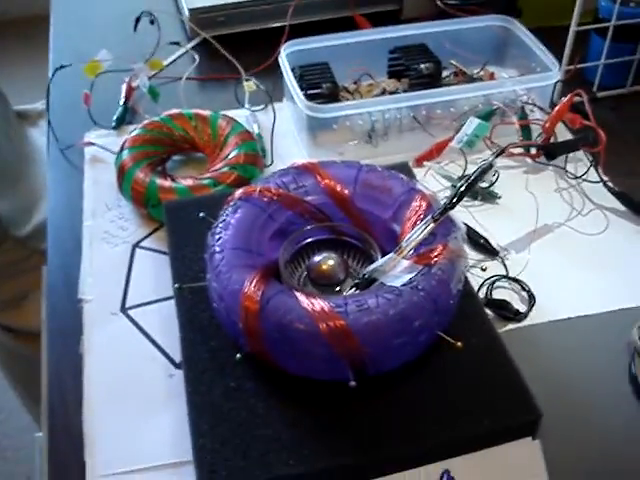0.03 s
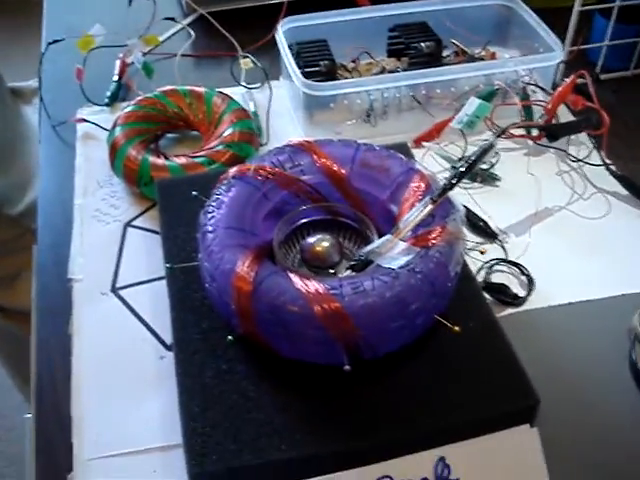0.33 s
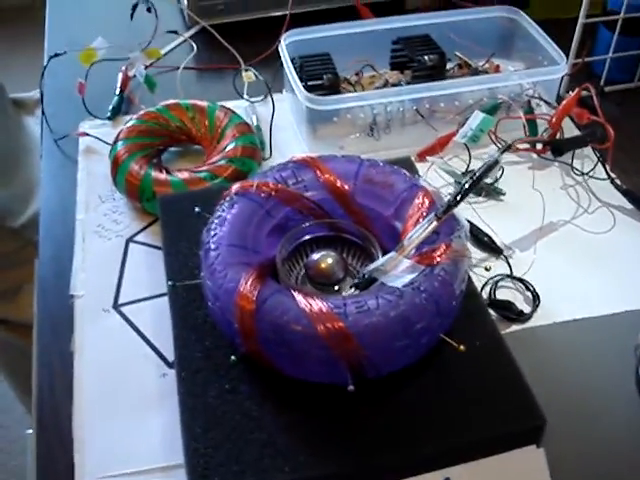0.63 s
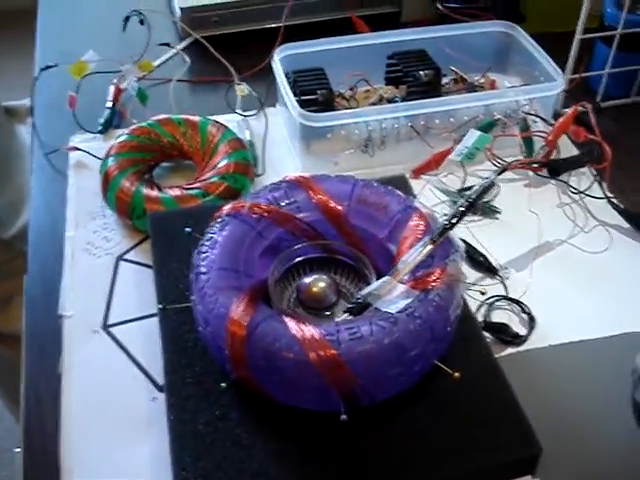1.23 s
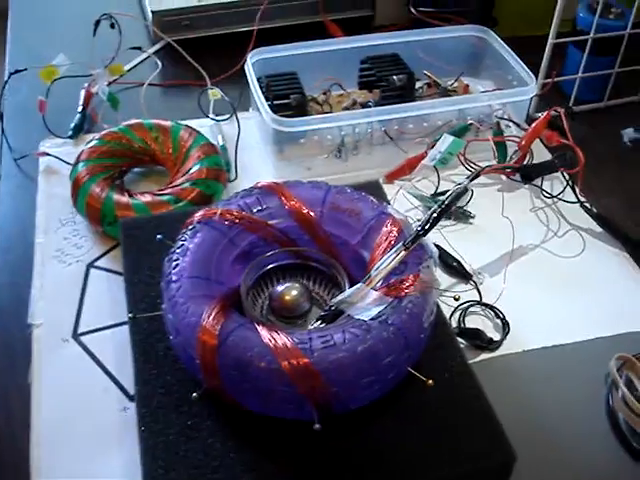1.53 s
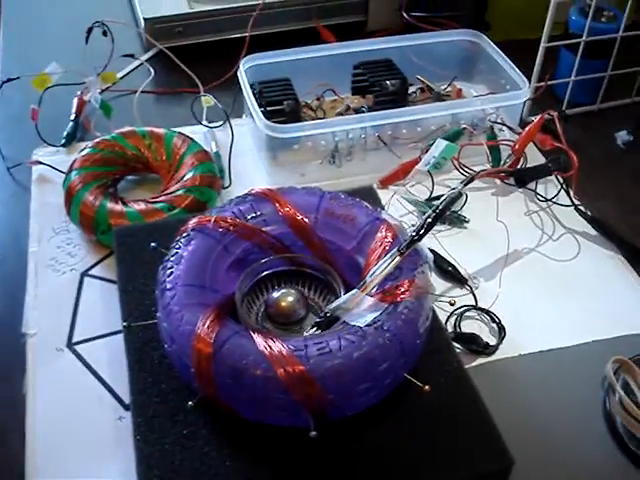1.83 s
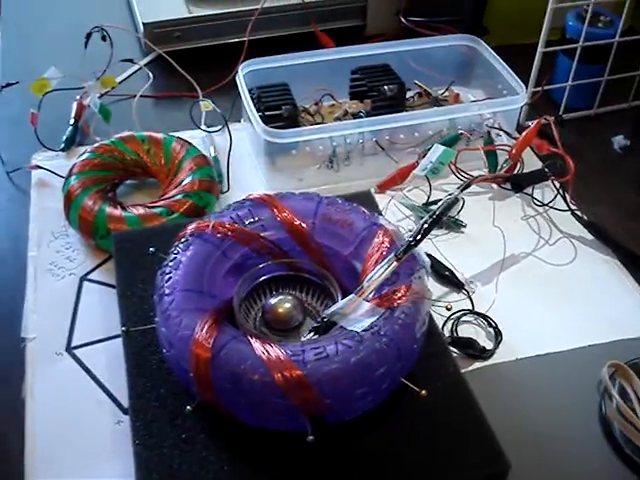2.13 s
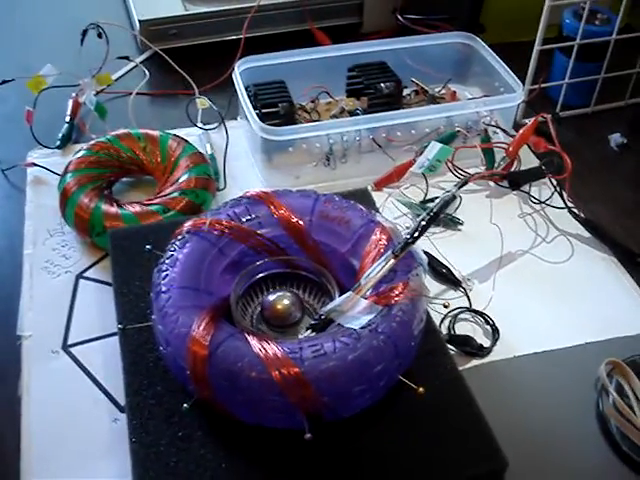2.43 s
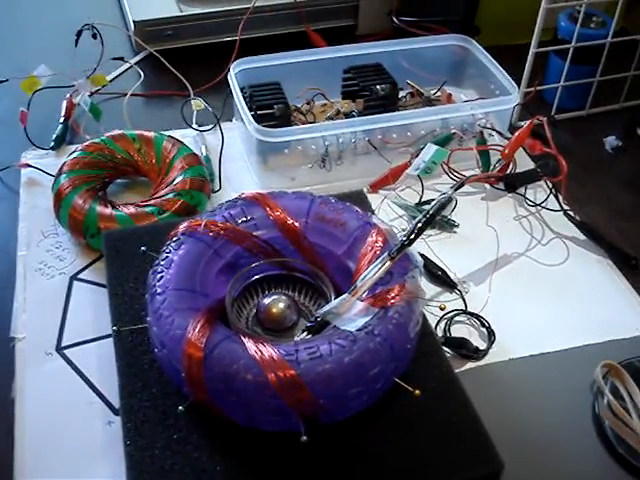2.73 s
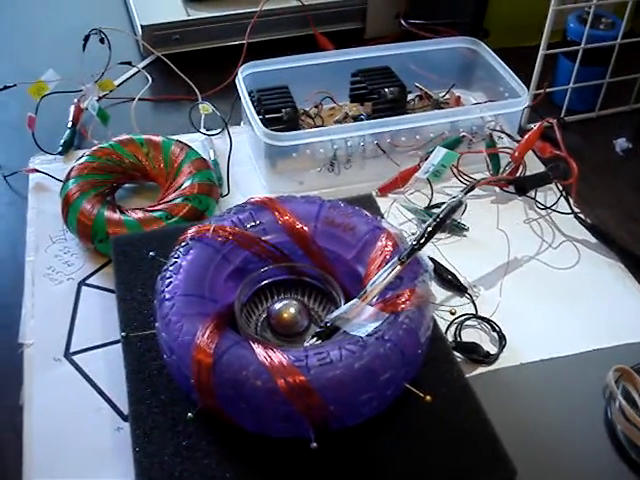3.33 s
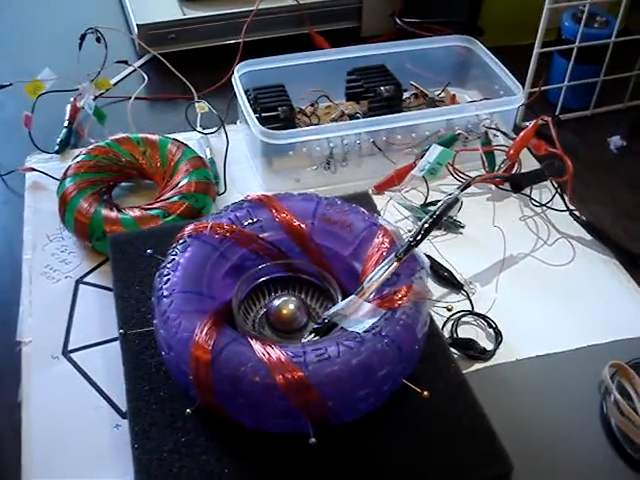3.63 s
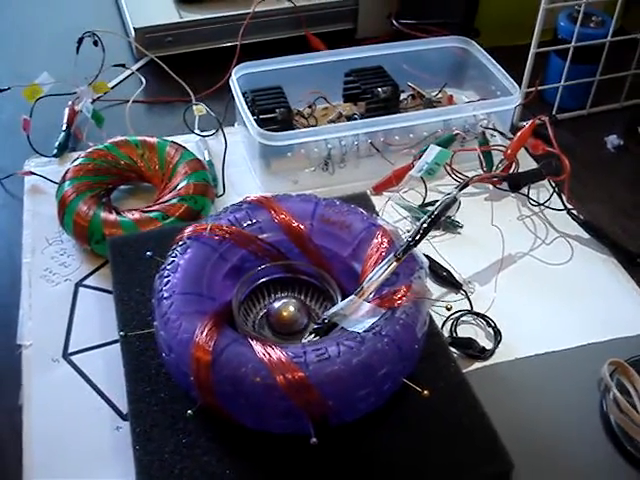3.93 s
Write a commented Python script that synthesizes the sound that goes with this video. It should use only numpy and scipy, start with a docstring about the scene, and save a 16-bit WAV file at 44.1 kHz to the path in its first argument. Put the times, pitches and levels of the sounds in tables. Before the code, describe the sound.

A steel ball whirrs and rattles round a metal cup, then slows to separate clatters.

```python
"""Steel ball in a ribbed cup

Close up at a workbench in a small room, one microphone: a steel ball spins round a ribbed metal cup
inside a wire coil. It rolls with a grainy whirr and hops off the wall in short runs of quickening
bounces, and every contact rings the cup. From about 2.5 s it slows: the rolling fades and it clatters
once a lap, further apart each time, until it only scuffs the wall. Low room noise lies behind it."""
import sys
import numpy as np
from scipy import signal
from scipy.fft import rfft, irfft
from scipy.io import wavfile

SR = 44100
rng = np.random.default_rng(int(sys.argv[2]) if len(sys.argv) > 2 else 0)


def master_out(mix):
    """Clip the mix to full scale and print it as 16-bit PCM to the path in sys.argv[1]."""
    frames = np.transpose(np.atleast_2d(mix))
    ceiling = np.clip(frames, -1, 1)
    pcm = np.round(ceiling * 32767).astype(np.int16)
    wavfile.write(sys.argv[1], SR, pcm)


N = 176400
T = np.arange(N) / SR

# How hard the rolling ball bears on the wall. Each row: time in seconds, level in dB.
ROLL_LEVEL = [(0, -26), (1, -27), (1.4, -25.5), (2.35, -25.5), (2.85, -28), (3.05, -31), (3.3, -33.5),
              (3.5, -35), (4, -40.5)]
# Runs of bounces off the wall. Each row: start in seconds, length in seconds, level in dB.
BOUNCE_RUNS = [(0.091, 0.012, -25), (0.184, 0.012, -26), (0.222, 0.019, -27), (0.261, 0.0047, -23.5),
               (0.274, 0.024, -25), (0.358, 0.028, -23), (0.498, 0.014, -25.5), (0.537, 0.022, -27.5),
               (0.575, 0.0088, -24.5), (0.618, 0.031, -23.5), (0.686, 0.0079, -27.5), (0.711, 0.0048, -22),
               (0.728, 0.019, -23), (0.795, 0.0083, -26), (0.821, 0.02, -23.5), (0.879, 0.02, -24),
               (0.927, 0.0084, -26.5), (0.959, 0.0052, -21), (1.045, 0.0088, -23), (1.097, 0.026, -24.2),
               (1.164, 0.019, -23.5), (1.204, 0.014, -24), (1.29, 0.027, -24.5), (1.338, 0.012, -23.5),
               (1.361, 0.0069, -21), (1.387, 0.011, -23.5), (1.415, 0.021, -23.5), (1.525, 0.02, -24.5),
               (1.572, 0.012, -23), (1.601, 0.018, -23), (1.659, 0.04, -22.5), (1.717, 0.023, -23),
               (1.768, 0.009, -25), (1.809, 0.041, -24), (1.874, .02, -25), (1.958, 0.0077, -24),
               (2.027, 0.005, -21), (2.055, 0.035, -23), (2.143, 0.023, -25), (2.184, 0.0087, -25.5),
               (2.224, 0.0035, -24.5), (2.255, .018, -24.5), (2.326, 0.02, -25), (2.464, 0.017, -28),
               (2.553, 0.015, -25), (2.595, 0.0072, -24), (2.633, 0.0079, -24), (2.677, 0.013, -25),
               (2.72, 0.0078, -26), (2.769, 0.0068, -27), (2.809, 0.0085, -27), (2.857, 0.0097, -24.5),
               (2.905, 0.01, -24.5), (2.953, 0.006, -25), (3.002, 0.0094, -21.5), (3.054, 0.0078, -21),
               (3.106, 0.0067, -22.5), (3.16, 0.0073, -23), (3.218, 0.0055, -22.5), (3.279, 0.0069, -21),
               (3.32, 0.0096, -30), (3.341, 0.0037, -20)]
# Scuffs in the last slow laps. Each row: start in seconds, length in seconds, level in dB.
WALL_SCUFFS = [(3.382, .014, -28.5), (3.402, .005, -26), (3.449, .014, -27.5), (3.471, .004, -26),
               (3.52, .025, -27), (3.596, .018, -27.5), (3.675, .017, -26), (3.766, .011, -30),
               (3.854, .017, -34.5), (3.956, .024, -40.5)]
# Contacts get longer and duller as the ball slows. Each row: time in seconds, half width in seconds.
CONTACT_WIDTH = [(1.7, 0.000025), (3.3, 0.000039), (3.5, 0.000049), (4, 0.000051)]
# One contact as the cup radiates it. Each row: frequency in Hz, relative level in dB.
TICK_SPECTRUM = [(100, -46), (300, -35), (430, -26), (510, -11.5), (660, -18.5), (800, -6.5), (1250, -1.5),
                 (1480, -5.5), (1780, -18.5), (2000, -7), (2550, -1.5), (3050, 0), (3400, -8.8),
                 (3950, -7.5), (4400, -15), (5000, -12), (7000, -21), (8400, -37)]
# The cup's ringing modes. Each row: frequency in Hz, gain over the tick in dB, T60 in seconds.
CUP_MODES = [(919.5, -2, 0.12), (1003, -8, 0.18), (1127, -7, 0.17), (1211, -3, 0.063), (1342.5, 1, 0.035),
             (1643, 2.5, 0.063), (2230, -11.5, .05), (2540, 3, 0.046), (2610, -2, 0.21), (3060, -9, 0.18),
             (3376, 4, 0.049), (3540, 1, .11), (4050, -0.5, 0.18), (4548, 8, 0.3)]
# Reflections reaching the microphone from coil and bench. Each row: delay in seconds, gain.
NEAR_ECHOES = [(.003685, .07), (.006393, .1), (.007212, .17), (.007378, -.11), (.007742, -.085),
               (.008122, .14)]
# Colour of the room noise. Each row: frequency in Hz, relative level in dB.
ROOM_TONE_SPECTRUM = [(25, -13), (70, -5.5), (90, -9.5), (120, 2), (160, 0), (1500, -2), (4000, -15.5),
                      (10000, -27)]
# The room noise swells towards the end. Each row: time in seconds, level in dB.
ROOM_TONE_LEVEL = [(0, -44.5), (1.8, -45.5), (4, -41)]


def rolling(count=6000, bumps_per_s=850, wobble_db=.9, scatter_db=1.8, airborne_db=-6):
    """The ball knocks over tiny bumps; its pressure wavers, rises before each run and drops during it."""
    times = np.cumsum(rng.gamma(2, .5, count)) / bumps_per_s
    wobble = wobble_db * np.interp(times, T, drift(hz=45))
    pressure = from_db(np.interp(times, *np.transpose(ROLL_LEVEL)) + wobble)
    lead_in, airborne = np.zeros(count), np.zeros(count, bool)
    for start, length, db in BOUNCE_RUNS:
        # the ball presses hardest 10 ms before it hops
        lead_in += from_db(db - 8) * np.exp(-.5 * ((times - start + .01) / .008) ** 2)
        airborne |= (times > start) & (times < start + length)
    unevenness = rms_one(from_db(scatter_db * np.clip(rng.standard_normal(count), -2, 2)))
    strength = unevenness * np.hypot(pressure, lead_in) * from_db(airborne_db * airborne)
    softness = 1.51 * np.exp(.21 * rng.standard_normal(count))  # some bumps are sharper, some blunter
    return contacts(times, strength * np.sqrt(SR / bumps_per_s), softness)


def bouncing(count=40, shortest_s=.002, restitution=.94, flight_scatter=.09, scatter_db=.9):
    """The ball hops off the wall: longer runs start with a higher hop, then the flights shorten."""
    hits = []
    for start, length, db in BOUNCE_RUNS:
        first_flight = shortest_s + .095 * length
        flights = np.maximum(first_flight * restitution ** np.arange(count), shortest_s)
        flights *= np.exp(flight_scatter * rng.standard_normal(count))
        landings = np.cumsum(flights) - flights
        strengths = from_db(db + scatter_db * rng.standard_normal(count)) * np.sqrt(first_flight * SR)
        hits += [(start + s, strength) for s, strength in zip(landings, strengths) if s < length]
    return contacts(*np.transpose(hits))


def scuffing(count=60, bumps_per_s=1100):
    """Too slow to hop, the ball grinds over a rough spot: a short, uneven crowd of soft bumps."""
    hits = []
    for start, length, db in WALL_SCUFFS:
        gaps = rng.gamma(2, .5, count) / bumps_per_s
        strength = from_db(db) * np.sqrt(SR / bumps_per_s)
        hits += [(start + s, strength) for s in np.cumsum(gaps) - gaps if s < length]
    return contacts(*np.transpose(hits), softness=1.25)


def contacts(times, strength, softness=1, reach_samples=12):
    """Force on the wall: bell-shaped pushes that widen as the ball slows, stretched by softness."""
    offsets = np.arange(-reach_samples, reach_samples + 1)[:, None]
    width = softness * SR * np.interp(times, *np.transpose(CONTACT_WIDTH))
    bells = np.exp(-.5 * (offsets / width) ** 2)
    pushes = strength * bells / bells.sum(0)
    samples = np.clip((times * SR).astype(int) + offsets, 0, N)
    return np.bincount(samples.ravel(), pushes.ravel(), N + 1)[:N]


def cup(force):
    """Every contact gives a short tick, feeds the cup's modes and leaves a brief metallic shimmer."""
    tick = coloured(force, TICK_SPECTRUM)
    sound = tick + shimmer(tick)
    for hz, db, t60 in CUP_MODES:
        radius = from_db(-60 / (t60 * SR))
        feed = np.array([1, 0, -1]) * (1 - radius ** 2) / 2  # unit gain at resonance
        feedback = [1, -2 * radius * np.cos(2 * np.pi * hz / SR), radius ** 2]
        sound += from_db(db) * signal.lfilter(feed, feedback, tick)
    return sound


def shimmer(tick, above_hz=3780, t60_s=.045, gain_db=.5):
    """Dense high modes, mixed anew at every contact: a hiss that follows the treble and dies quickly."""
    highpass = signal.butter(4, above_hz, "high", fs=SR, output="sos")
    retained = from_db(-60 / (t60_s * SR)) ** 2
    energy = signal.lfilter([1 - retained], [1, -retained], signal.sosfilt(highpass, tick) ** 2)
    random_force = contacts(T, rng.standard_normal(N), reach_samples=4)
    hiss = rms_one(signal.sosfilt(highpass, coloured(random_force, TICK_SPECTRUM)))
    return from_db(gain_db) * np.sqrt(energy) * hiss


def bench_knock(start_s=.162, hz=324, attack_s=.0046, t60_s=.054, gain_db=-25):
    """One soft, dull bump at the bench that dies at once."""
    age = np.maximum(T - start_s, 0)
    envelope = from_db(gain_db - 60 * age / t60_s) * (1 - np.exp(-age / attack_s))
    return envelope * np.sin(2 * np.pi * hz * age)


def workshop(direct, tail_db=-11.5, t60_s=.17, delay_s=.0051):
    """The microphone hears the direct sound, near reflections and the short tail of a small room."""
    echoes = sum(gain * np.interp(T - delay, T, direct, left=0) for delay, gain in NEAR_ECHOES)
    age = T[:SR // 2]
    tail = rng.standard_normal(len(age)) * from_db(-60 * age / t60_s) * (age > delay_s)
    reverb = signal.fftconvolve(direct, tail / np.linalg.norm(tail))[:N]
    return direct + echoes + from_db(tail_db) * reverb


def room_tone():
    """Low noise behind the bench, swelling a little towards the end."""
    level = from_db(np.interp(T, *np.transpose(ROOM_TONE_LEVEL)))
    return level * coloured(rng.standard_normal(N), ROOM_TONE_SPECTRUM)


def coloured(x, spectrum, size=4096):
    """Causal (minimum-phase) filter of unit energy that follows a spectrum."""
    hz, db = np.transpose(spectrum)
    bin_hz = np.arange(size // 2 + 1) * SR / size
    gain = from_db(np.interp(np.log(bin_hz + 1), np.log(hz), db))
    causal_fold = 1 + np.sign(size // 2 - np.arange(size))
    cepstrum = irfft(np.log(gain)) * causal_fold
    response = irfft(np.exp(rfft(cepstrum)))
    return signal.fftconvolve(x, response / np.linalg.norm(response))[:N]


def drift(hz):
    """Random motion below hz, rms 1."""
    lowpass = signal.butter(2, hz, fs=SR, output="sos")
    return rms_one(signal.sosfilt(lowpass, rng.standard_normal(N + SR))[SR:])


def from_db(db):
    """Decibels to gain."""
    return 10 ** (np.asarray(db) / 20)


def rms_one(x):
    """Scale to rms 1."""
    return x / np.sqrt(np.mean(x ** 2) + 1e-20)


def scene():
    """Ball and cup up front, one bump at the bench and room tone behind, in mono."""
    force = rolling() + bouncing() + scuffing()
    bench = cup(force) + bench_knock()
    return (workshop(bench) + room_tone())[None]


def record(dry):
    """The microphone signal is cut steeply above 10150 Hz."""
    return signal.sosfilt(signal.ellip(12, .1, 90, 10150, fs=SR, output="sos"), dry)


dry = scene()
out = record(dry)
master_out(out)
```